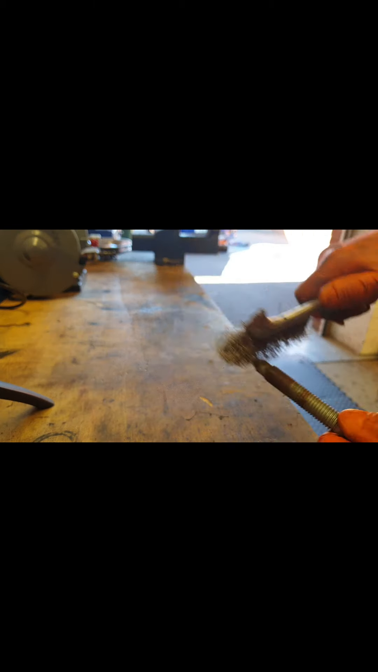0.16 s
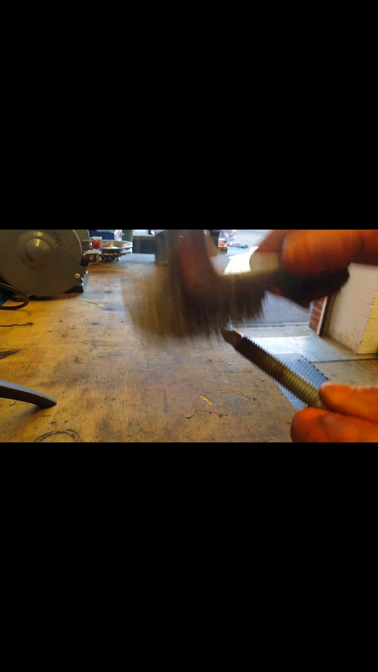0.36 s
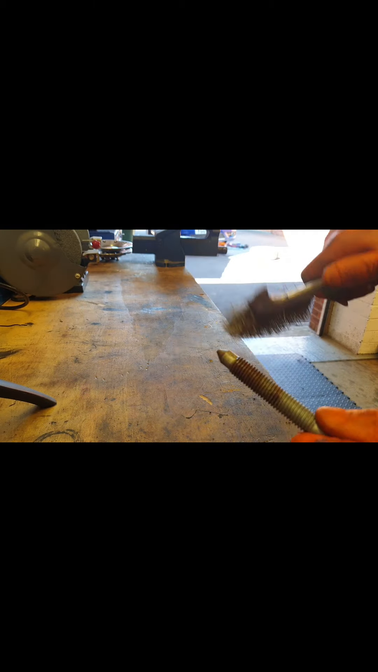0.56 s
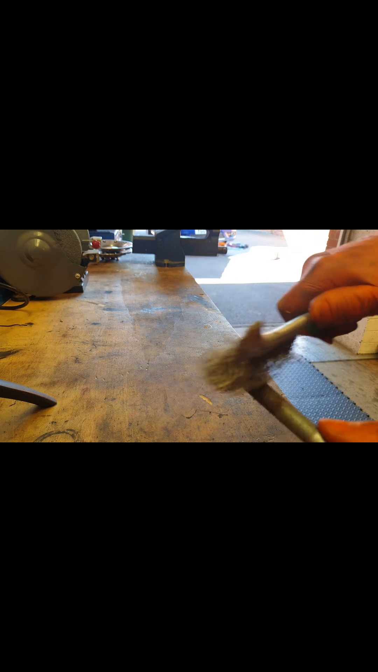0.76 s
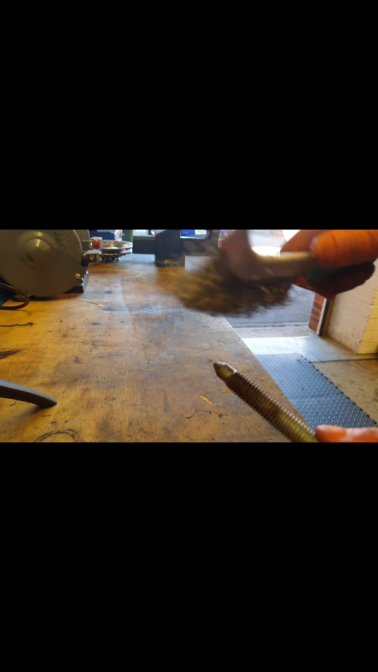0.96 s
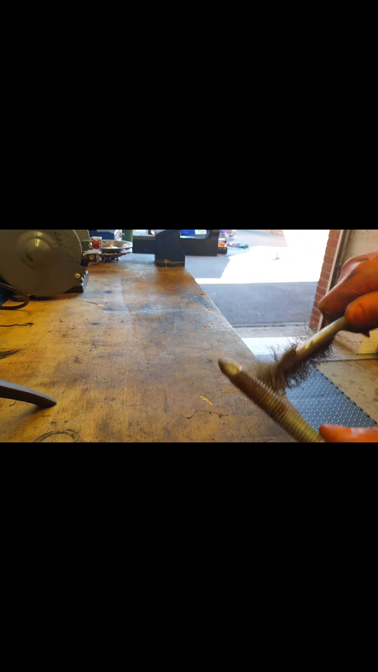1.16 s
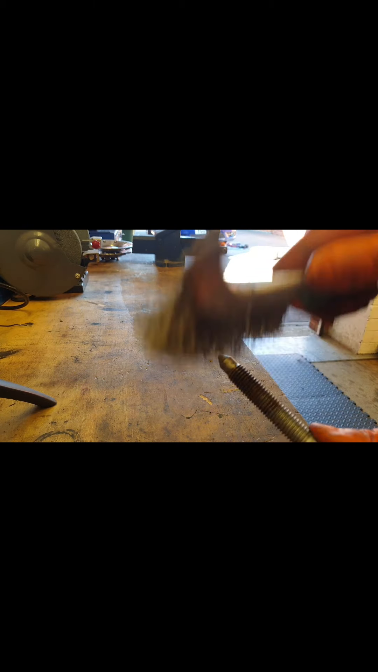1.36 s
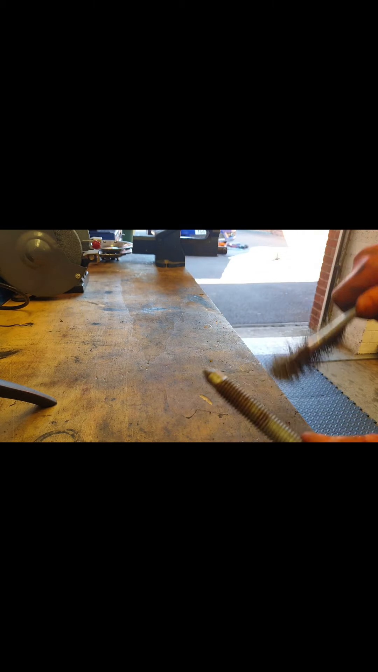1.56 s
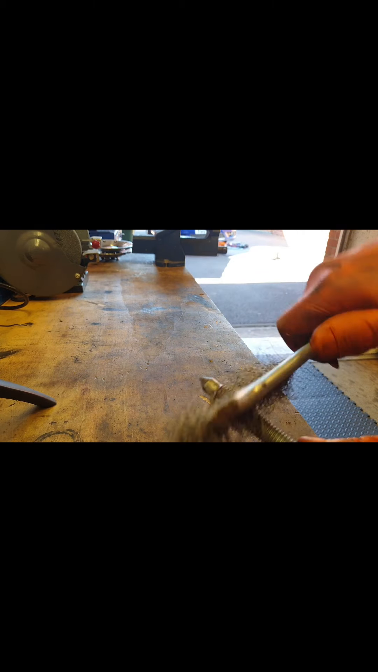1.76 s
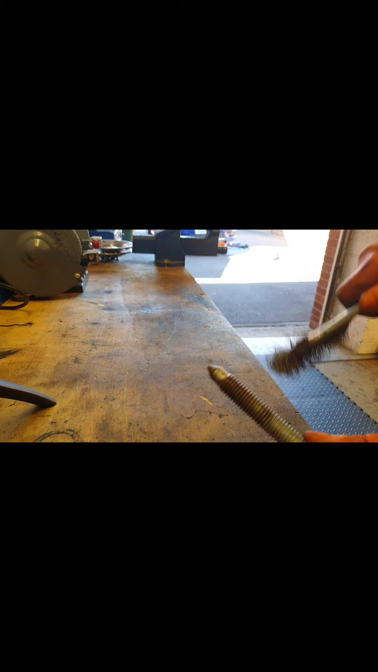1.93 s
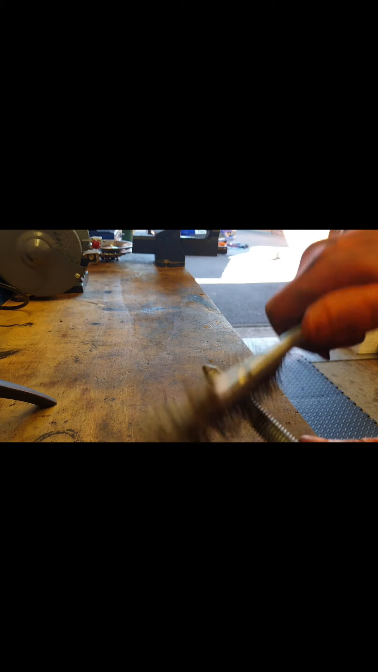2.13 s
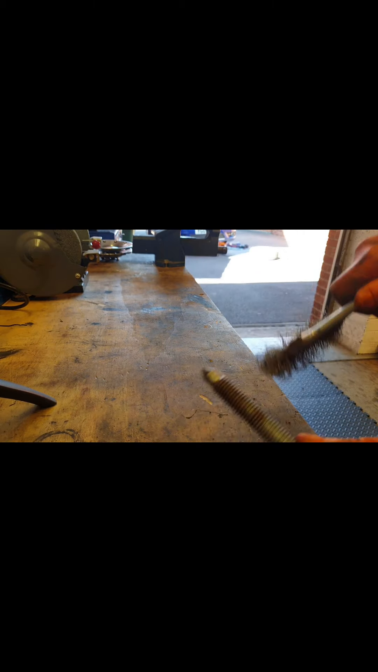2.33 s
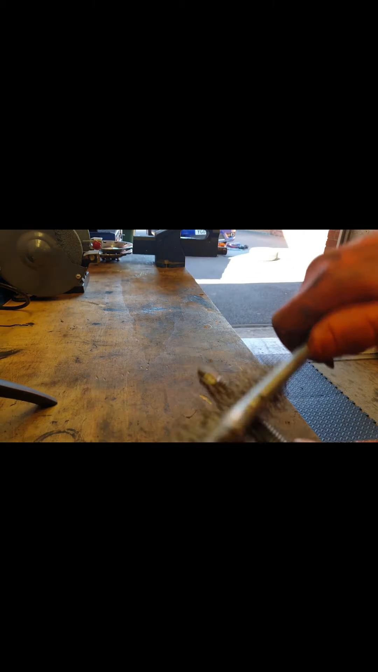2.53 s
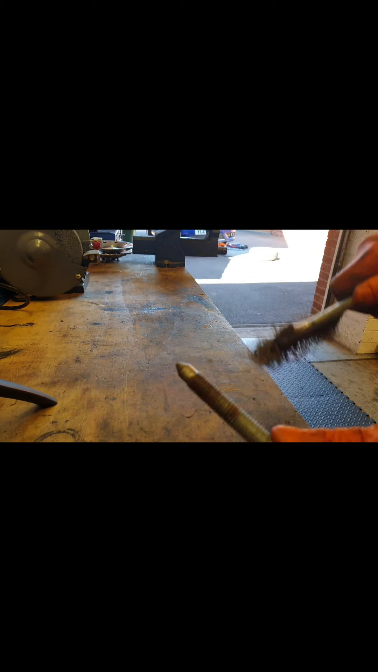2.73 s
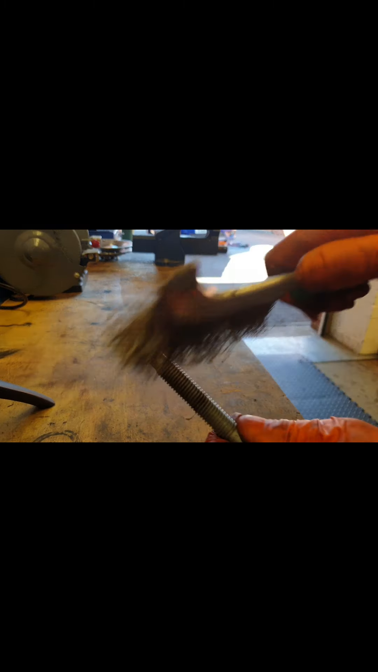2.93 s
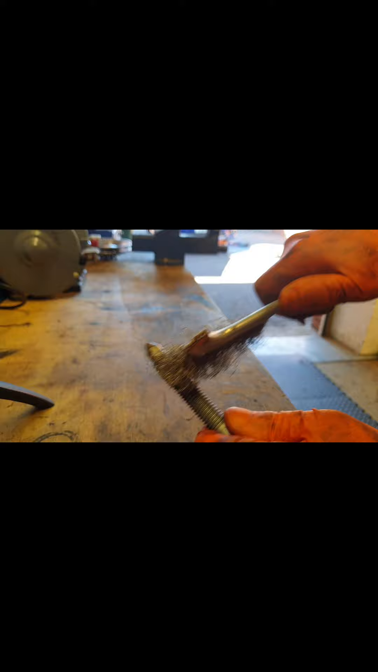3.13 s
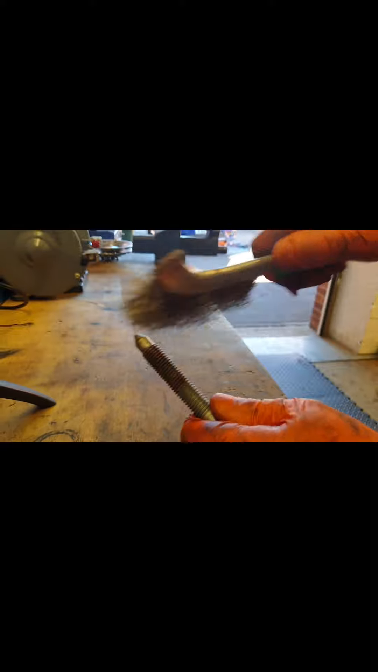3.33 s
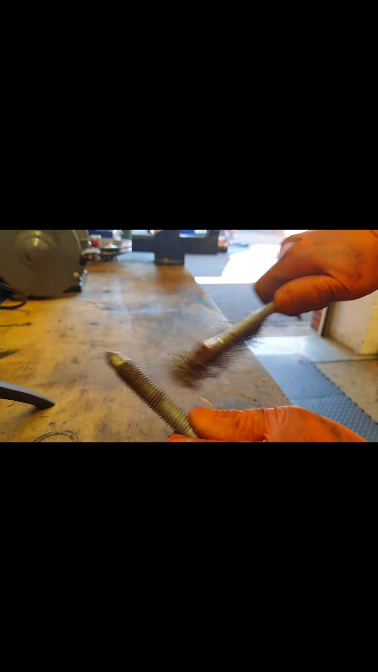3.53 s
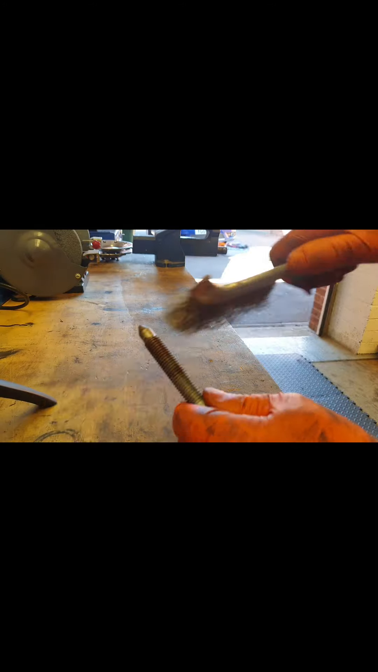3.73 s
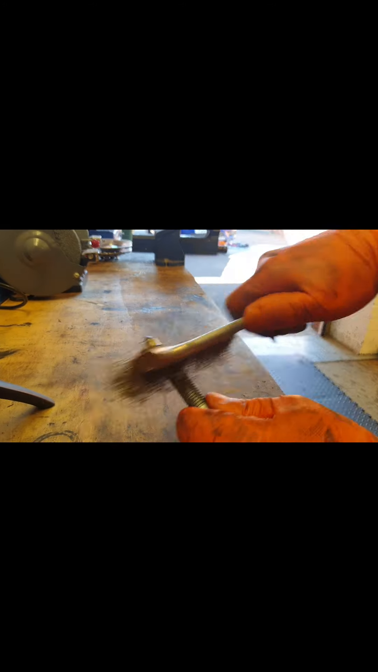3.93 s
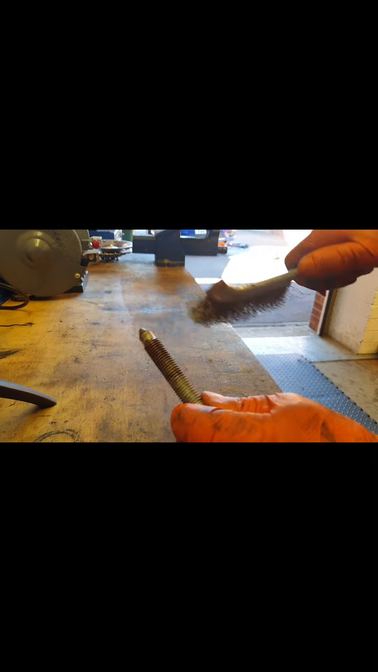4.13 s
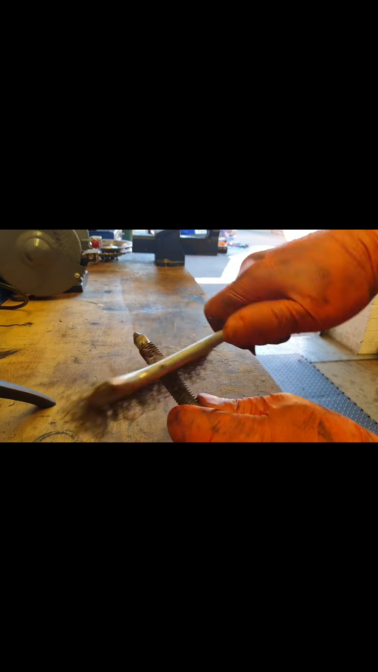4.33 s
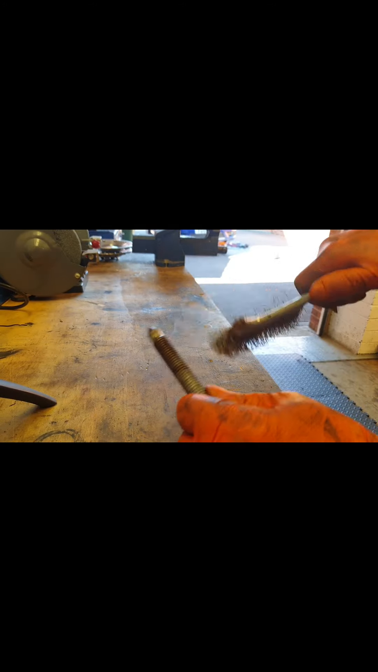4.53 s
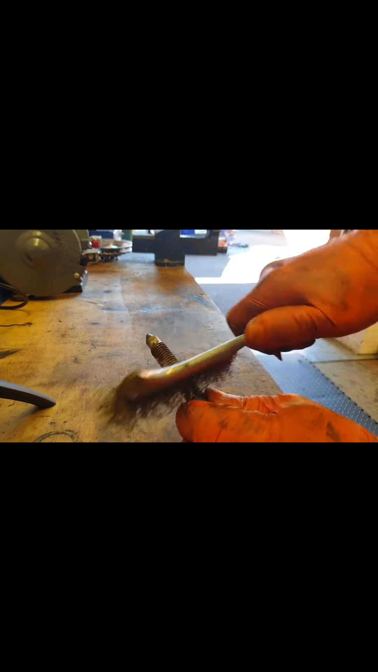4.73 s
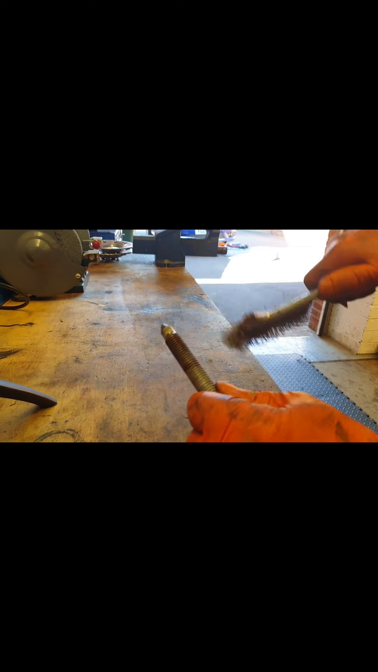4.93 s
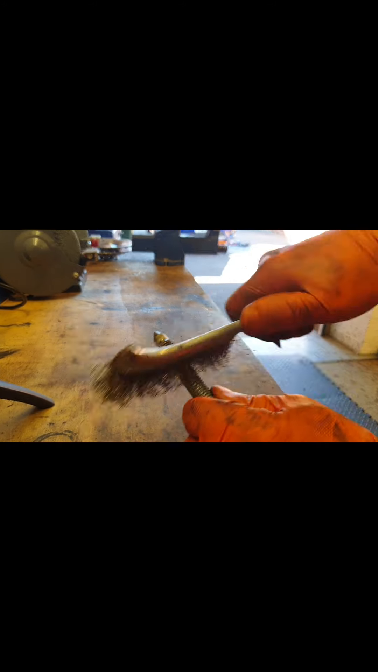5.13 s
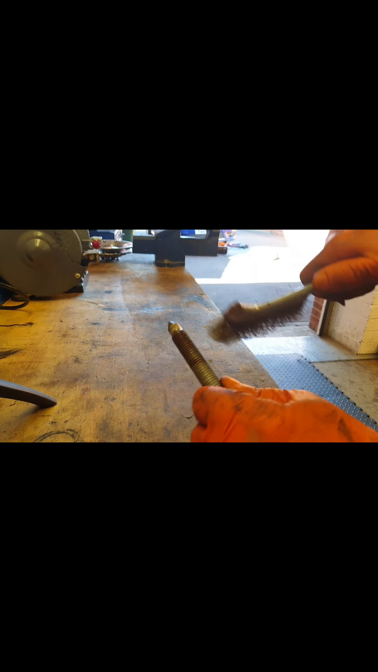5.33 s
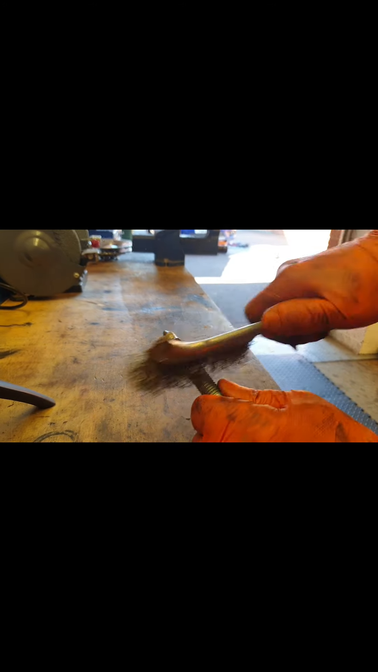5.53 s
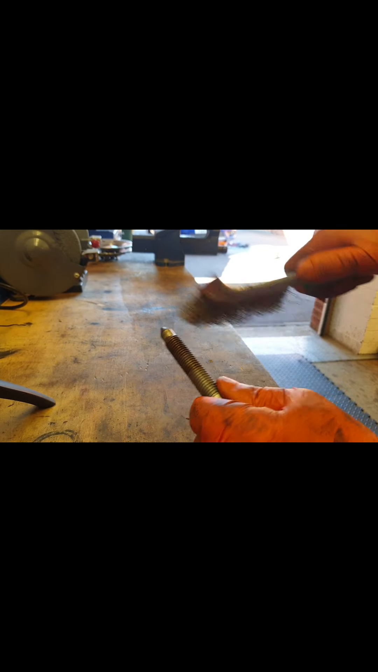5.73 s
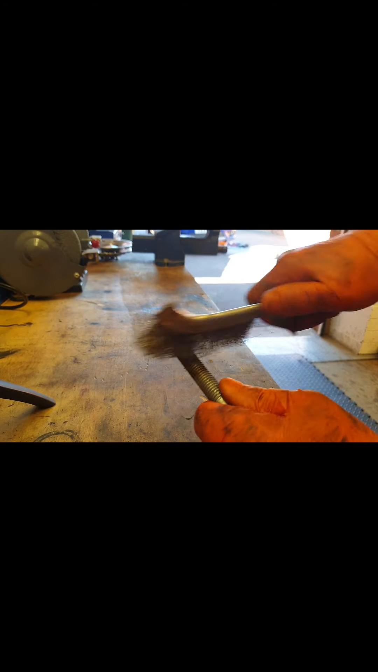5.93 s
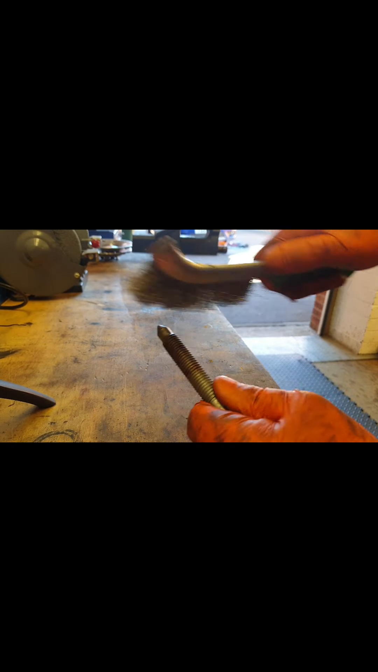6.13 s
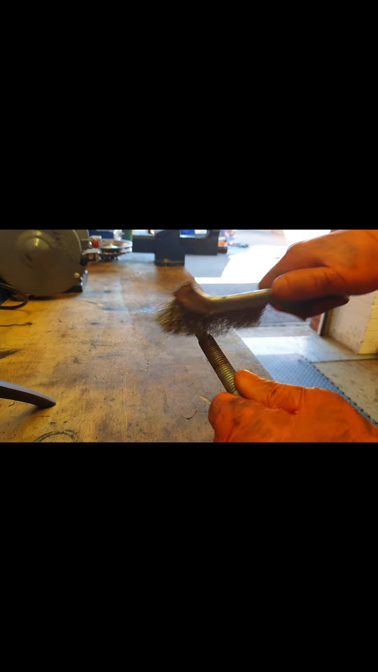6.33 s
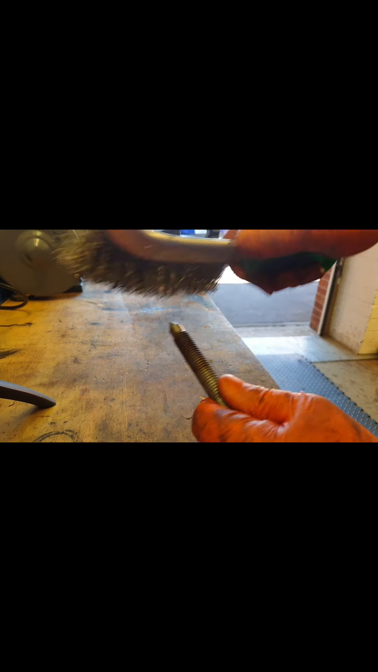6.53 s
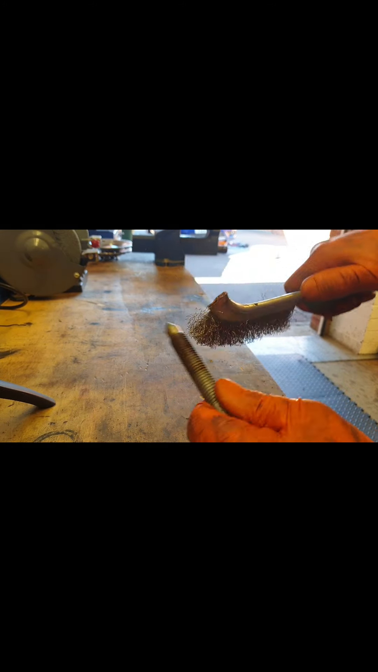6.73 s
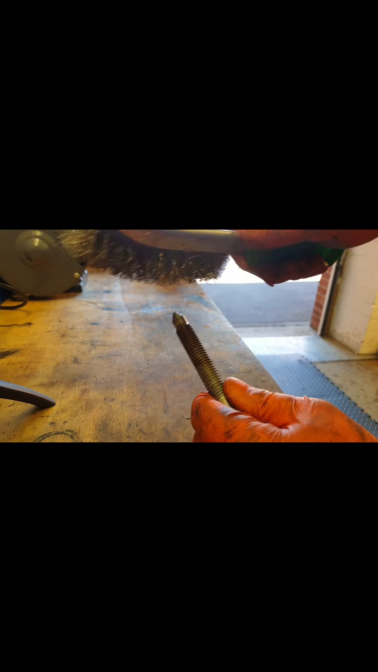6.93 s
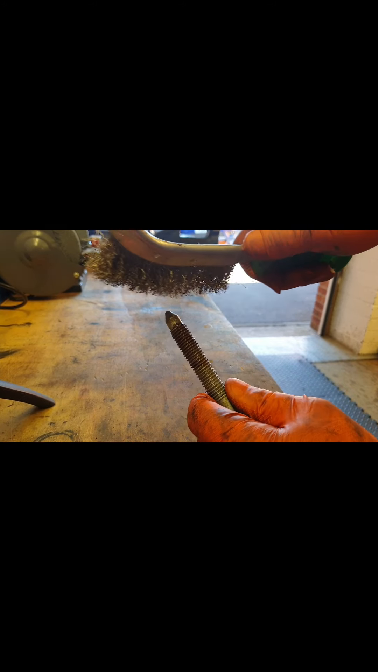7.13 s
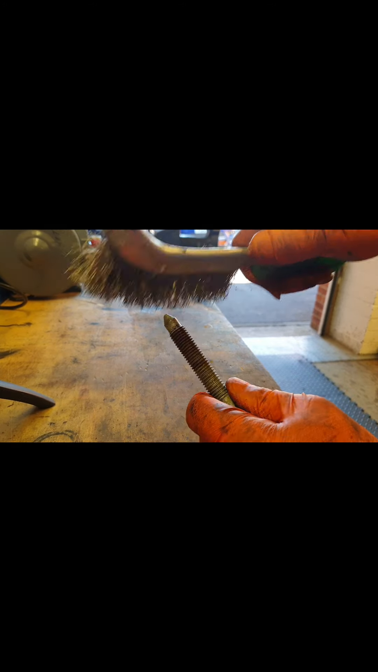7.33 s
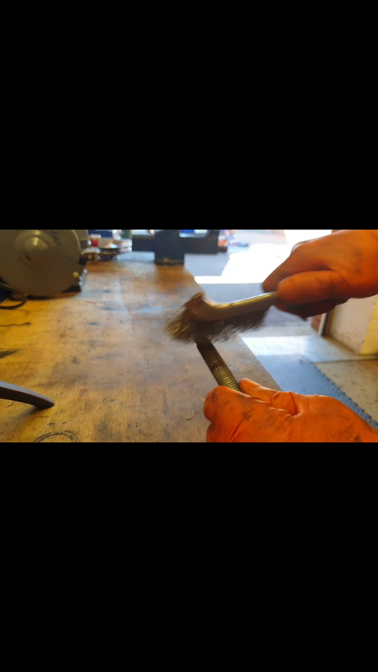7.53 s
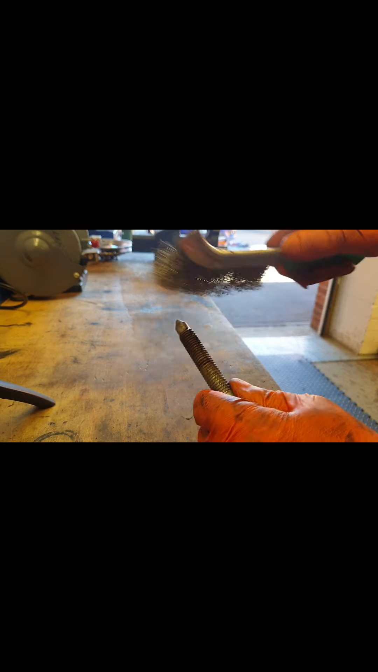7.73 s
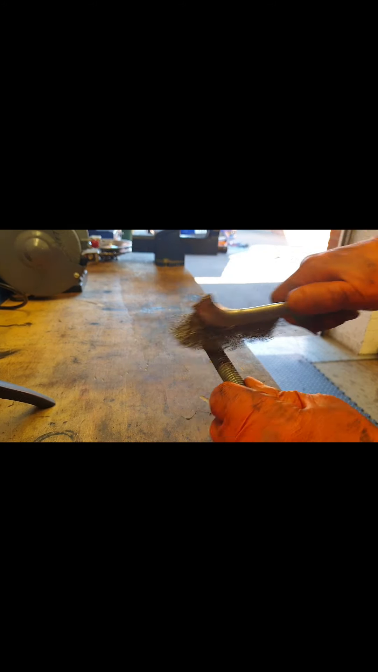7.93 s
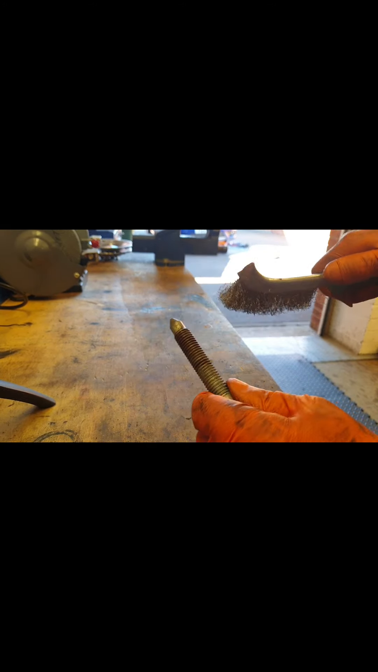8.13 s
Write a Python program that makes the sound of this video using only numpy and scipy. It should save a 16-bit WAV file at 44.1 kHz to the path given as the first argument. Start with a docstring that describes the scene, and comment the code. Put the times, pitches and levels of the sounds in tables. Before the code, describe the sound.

A wire brush rasps in short, bright, slightly ringing strokes across a steel bolt thread, about three a second, with bench thumps growing stronger in a small workshop.

```python
"""On a workbench in a small workshop, a hand wire brush sweeps twenty times across the thread of a steel bolt.
Slipping bristles are bursts of noise that rasp, bend and ring the steel; snagged wires twang as decaying tones.
Each push thumps the bench in its low mode, with noise for the higher ones, and freed wires ring on faintly.
Cloth, skin, loose wires and crumbs of rust add small sounds; a tail of decaying noise answers the brush
over room rumble and a low wavering hum."""
import sys
import numpy as np
from scipy import signal
from scipy.fft import rfft, irfft, next_fast_len
from scipy.io import wavfile
from scipy.ndimage import map_coordinates

SR = 44100
rng = np.random.default_rng(int(sys.argv[2]) if len(sys.argv) > 2 else 0)


def to_wav(sig):
    """Store sig (one row per channel, or 1-D mono) as 16-bit WAV at the path in sys.argv[1].

    Samples outside -1..1 are clipped; the rate is SR.
    """
    pcm = np.clip(np.atleast_2d(sig), -1, 1) * 32767
    pcm = np.round(pcm).astype(np.int16)
    wavfile.write(sys.argv[1], SR, pcm.T)  # frames by channels


N = 360297
T = np.arange(N) / SR

# strokes of the brush, levels before the layer gains; skim_s is the time before the wires bite, bend and
# twang are relative to the scrape, land and shove are thumps of the bench:
# start_s, length_s, skim_s, skim_db, scrape_db, bend_db, twang_db, land_db, shove_db
STROKES = [ (0.104, 0.17, 0.0049, -59, -49, -15, 1.5, -56, -48),
           (0.475, 0.1, 0.02, -52, -45.5, -14.5, -0.5, -63, -61),
           (0.786, 0.14, 0.027, -55.5, -45.5, -14, 1.5, -56, -53.5),
           (1.136, 0.12, 0.0045, -60.5, -45, -16.5, 2.5, -56, -45.5),
           (1.497, 0.11, 0.028, -51.5, -41.5, -17, 1, -40.5, -42.5),
           (1.846, 0.12, 0.053, -53.5, -42, -18.5, 2.5, -42.5, -42.5),
           (2.245, 0.13, 0.051, -49, -45, -17, 1, -48.5, -46),
           (2.627, 0.12, 0.017, -51.5, -45, -18.5, 0, -54, -45.5),
           (3.116, 0.14, 0.082, -52.5, -44.5, -15.5, -4, -60, -43.5),
           (3.522, .115, 0.045, -55.5, -44.5, -11, -2.5, -40, -36),
           (3.958, 0.15, 0.032, -53, -43, -13, -5, -46, -37),
           (4.403, .151, 0.038, -62, -43, -13.5, -3, -44.5, -42),
           (4.805, 0.14, 0.022, -54, -43.5, -10, 0, -37.5, -35),
           (5.197, .148, .045, -56.5, -43.5, -12.5, 0.5, -33, -30.5),
           (5.571, 0.14, 0.048, -56.5, -44, -11, 4, -36, -26),
           (5.944, 0.14, 0.029, -57, -44, -14, -0.5, -29.5, -26.5),
           (6.303, 0.17, 0.028, -60, -43.5, -11.5, 0.5, -30.5, -26.5),
           (6.681, 0.15, 0.067, -50, -47, -11, 4.5, -26.5, -30.5),
           (7.509, 0.16, 0.033, -56.5, -45, -13, -0.5, -33.5, -29),
           (7.947, 0.14, .07, -49.5, -45.5, -10, 0.5, -37, -32), ]
# relative spectrum of rubbed cloth, also used for the crumbs: frequency_hz, level_db
CLOTH_SPECTRUM = [(250, -5), (500, -9.5), (900, -4), (2500, -4), (4000, -3), (7000, 0), (9000, -5.5),
                  (14500, -2.5)]


def amp(db):
    """Level to amplitude: 20 dB is a factor of ten."""
    return 10 ** (np.asarray(db) / 20)


def unit(x):
    """Normalisation of the root mean square to 1."""
    return x / np.sqrt(np.mean(x ** 2) + 1e-20)


def along(points, hz):
    """Interpolation of (frequency, value) points on a logarithmic frequency axis."""
    f, v = np.transpose(points)
    return np.interp(np.log(hz + 1), np.log(f + 1), v)


def wobble(rate):
    """Slow random modulation: a spline through normal deviates, rate knots a second."""
    knots = rng.standard_normal(int(N * rate / SR) + 4)
    return map_coordinates(knots, [T * rate])


def filtered(x, response):
    """Linear filtering: the spectrum of x times a response of frequency."""
    m = next_fast_len(N + SR)
    hz = np.fft.rfftfreq(m, 1 / SR)
    return irfft(rfft(x, m) * response(hz), m)[..., :N]


def coloured(x, spectrum):
    """Spectral shaping by a magnitude response of mean power 1."""
    return filtered(x, lambda hz: unit(amp(along(spectrum, hz))))


def ringing(x, modes):
    """Modal resonance: a sum of damped second-order modes, of mean power 1."""
    def response(f):
        h = sum(amp(db) * 1j * f * width / (centre * centre - f * f + 1j * f * width)
                for centre, width, db in modes)
        return h / np.sqrt(np.mean(abs(h) ** 2))
    return filtered(x, response)


def noise():
    """Interchannel coherence: stereo white noise, most alike in the bass, unrelated at the top."""
    # correlation of left and right: frequency_hz, share
    likeness = [(70, 0.93), (250, 0.8), (600, 0.36), (1200, 0.033), (2200, 0.39), (4500, 0.066), (14000, 0)]

    def mid_side(hz):
        turn = np.arccos(np.clip(along(likeness, hz), -1, 1)) / 2
        return np.array([np.cos(turn), np.sin(turn)])
    mid, side = filtered(rng.standard_normal((2, N)), mid_side)
    return np.array([mid + side, mid - side])


def swells(rows):
    """Gain of light friction: each rub grows and fades exponentially, linearly in decibels."""
    gain = 0
    for s, db, rise, fall in rows:
        drop = np.maximum((s - T) * rise, (T - s) * fall)
        gain = gain + amp(db - np.minimum(drop, 100))
    return gain


def slips(rate, spread_db, life):
    """Stick-slip friction: contacts give way at random moments as short bursts; envelope of rms 1."""
    happens = rng.random(N) < rate / SR
    sizes = amp(spread_db * np.clip(rng.standard_normal(N), -2, 2)) * happens
    power = signal.lfilter([1], [1, -np.exp(-2 / (life * SR))], sizes ** 2)
    return unit(np.sqrt(power))


def background(air_db, hum_db):
    """Ambient noise: steady treble, and unsteady rumble and hum that grow over the first four seconds."""
    # relative spectrum of the room: frequency_hz, level_db
    air_spectrum = [(25, -39), (75, 3), (130, -7.5), (250, -9), (340, -20), (430, -24), (600, -29),
                    (1100, -30), (2300, -31), (3400, -32.5), (6000, -34.5), (7500, -34), (8600, -44),
                    (11000, -36.5), (14500, -31.5)]
    # wavering hum tone, level before the growth: frequency_hz, level_db
    hum_tone = [(253, -74)]
    hum = sum(amp(db + 1.5 * wobble(5)) * np.sin(2 * np.pi * hz * T + .6 * wobble(8)) for hz, db in hum_tone)
    growth = amp(np.interp(T, [0, 4], [-7, 0]))
    air = amp(air_db) * coloured(noise(), air_spectrum)
    rumble = filtered(air, lambda hz: 1 / (1 + (hz / 600) ** 4))
    treble = air - rumble
    return treble + growth * (amp(3.4 * wobble(4.0)) * rumble + amp(hum_db) * hum)


def workshop(x, near_db, far_db, near_t60):
    """Reverberation: the bench top answers within milliseconds, the walls with a longer tail."""
    # reverberation time of the workshop: frequency_hz, t60_s
    shop_decay = [(100, 0.44), (1000, 0.69), (2000, 0.31), (4800, 0.32), (6300, 0.3), (9000, 0.32),
                  (14000, 0.26)]
    hz, t, z = signal.stft(rng.standard_normal((2, SR * 3 // 4)), SR, nperseg=256)
    tail = signal.istft(z * amp(-60 * t / along(shop_decay, hz)[:, None]), SR, nperseg=256)[1]
    age = np.arange(tail.shape[1]) / SR
    near = rng.standard_normal(tail.shape) * amp(-60 * age / near_t60) * (age > .001)
    answer = amp(near_db) * near / np.linalg.norm(near[0]) + amp(far_db) * tail / np.linalg.norm(tail[0])
    return x + signal.fftconvolve(x, answer, axes=1)[:, :N]


def sleeve(level_db):
    """Friction noise of fibres: cloth slides while the hand shifts its grip."""
    # slides of the sleeve, levels before the layer gain: loudest_s, level_db, rise_db_per_s, fall_db_per_s
    slides = [(2.76, -54.5, 900, 153), (2.885, -57, 222.5, 206), (3.08, -53.5, 103, 140.5),
              (3.3, -63.5, 124, 117), (3.476, -54, 214, 258)]
    fibres = slips(rate=4000, spread_db=3, life=.002)
    return amp(level_db) * coloured(swells(slides) * fibres * noise(), CLOTH_SPECTRUM)


def grip(level_db):
    """Friction-driven resonance: skin chafes on the brush handle, which answers with a hollow note."""
    # rubs of the hand, levels before the layer gain: loudest_s, level_db, rise_db_per_s, fall_db_per_s
    chafes = [(1.275, -59, 202, 126), (2.70, -62.5, 702, 100), (3.14, -69.5, 198, 156),
              (7.485, -60.5, 210, 144.5)]
    handle = [(180, 0.5), (300, -8.5), (410, 3.0), (520, -13.0), (800, -37)]  # frequency_hz, level_db
    return amp(level_db) * coloured(swells(chafes) * noise(), handle)


def crumbs(level_db, t60):
    """Exponential decay of noise: rust lands on the bench in faint rustling patters, sharp at first, then dying away."""
    # landings, levels before the layer gain: start_s, level_db
    landings = [(3.76, -53.5), (3.7728, -58), (3.809, -53), (3.833, -56), (4.2936, -55.5)]
    patters = sum(amp(db - 60 * np.clip((T - s) / t60, 0, 2)) * (T >= s) for s, db in landings)
    return amp(level_db) * coloured(patters * noise(), CLOTH_SPECTRUM)


def loose_wires(length, level_db):
    """Lightly damped wires: thin wavering notes swell and fade; the lifted brush shivers wire on wire."""
    # notes of loose wires, levels before the layer gain: loudest_s, level_db, pitch_hz
    singing = [(0.06, -79, 5200), (0.731, -87, 5180), (1.43, -82, 5170), (2.08, -81, 6300),
               (3.34, -71.5, 5120), (4.68, -77, 5100)]
    # shivers of the brush: loudest_s, level_db, rise_db_per_s, fall_db_per_s
    shivers = [(6.9, -72, 130, 127), (7.01, -69, 239.5, 240)]
    notes = 0
    for s, db, hz in singing:
        swell = amp(db - 6.8 * np.minimum(((T - s) / length) ** 2, 20))
        notes = notes + swell * np.sin(2 * np.pi * hz * T + 0.67 * wobble(110))
    # modes: frequency_hz, width_hz, level_db
    shiver = ringing(swells(shivers) * noise(), [(5200, 300, -8), (6520, 1800, -5)])
    return amp(level_db + 6.2 * wobble(60)) * notes + shiver


def contact(start, end, rise, release):
    """Contact gate: a linear onset and an exponential release."""
    return np.clip((T - start) / rise + .5, 0, 1) * np.exp(-np.clip((T - end) / release, 0, 20))


def bench(swell, thump_db, knock_db, shake_db, shake_s):
    """Forced plate vibration: each push swells and fades in the low mode; higher panel modes rumble along."""
    # relative spectrum of the panel modes: frequency_hz, level_db
    knock_spectrum = [(25, -10), (50, 11.5), (90, 6), (125, -3), (170, -6), (210, -13), (260, -12.5),
                      (330, -20), (430, -25), (600, -35), (1200, -34.5)]
    low_hz, scatter = 71.26, 0.079  # low mode of the bench top, its log spread from push to push
    shove_lead_s, midway_db = 0.0422, -7.5  # shove ahead of the lift; weaker push halfway
    rebound_db, rebound_follows, rebound_lag_s = -31, 0.64, 0.0202  # level, dB per dB of shove, delay after lift
    shake_follows = 0.31  # dB of lingering shake per dB of shove
    low, push, rub = np.zeros((3, N))
    all_detunes = rng.standard_normal((len(STROKES), 4))
    for (s, length, *_, land_db, shove_db), detunes in zip(STROKES, all_detunes):
        shove = s + length - shove_lead_s
        pushes = [(s, land_db),
                  ((s + shove) / 2, (land_db + shove_db) / 2 + midway_db),
                  (shove, shove_db),
                  (s + length + rebound_lag_s, rebound_db + rebound_follows * shove_db)]
        for (at, db), detune in zip(pushes, detunes):
            span = slice(round(at * SR), round(at * SR) + SR // 2)
            t = np.abs(T[span] - at)
            shape = amp(db) * (t / swell * np.exp(1 - t / swell)) ** 1.75
            low[span] += shape * np.sin(2 * np.pi * low_hz * np.exp(scatter * detune) * t)
            push[span] += shape
        # the bench keeps shaking after every stroke
        rub += amp(shake_follows * shove_db) * contact(s, s + length, rise=0.028, release=shake_s)
    panel = coloured((amp(knock_db) * push + amp(shake_db) * rub) * noise(), knock_spectrum)
    return amp(thump_db) * low + panel


def pressure(release):
    """Friction follows load: gains of scrape, bend and twang as wires skim, bite, press harder and lift."""
    # the brush skips off the thread in mid-stroke: centre_s, half_length_s, depth_db
    skips = [(0.172, 0.007, 16), (0.203, 0.016, 12), (0.854, 0.0055, 15), (3.545, .01, 11.5),
             (5.217, 0.0075, 6), (6.397, .016, 18.5), (6.757, 0.01, 13), (8.008, .012, 8.5),
             (8.082, .012, 8)]
    bite_s, lift_s, lift_db = 0.024, 0.012, 6.5  # time to dig in, time to ease off, level lost by then
    swell_db, bend_grows_db = 3.5, 2  # growth of the scrape over a stroke, further growth of the bending
    light_bend_db = 3.5  # under light pressure bending outweighs the rasp a little more
    # share of the stroke where wires twang most, fall to either side, level there
    twang_peak, twang_fade_db, twang_peak_db = .38, 28, 2.5
    uneven_db, uneven_rate = 1.66, 70  # the hand's pressure wavers: depth, knots per s
    gains = np.zeros((3, N))
    for s, length, skim, skim_db, db, bend_db, twang_db, _, _ in STROKES:
        span = slice(round(s * SR), round((s + length + .1) * SR))
        t = T[span] - s
        way = np.minimum(t / length, 1)
        bite = np.clip((t - skim) / bite_s + .5, 0, 1)
        ease = np.clip((t - length) / lift_s + 1, 0, 1)
        level = skim_db + bite * (db + swell_db * (way - .5) - skim_db) - lift_db * ease
        scrape = amp(level) * np.exp(-np.maximum(t - length, 0) / release)
        bend = amp(bend_db + bend_grows_db * (way - .5) + light_bend_db * (1 - bite + ease))
        twang = amp(twang_db + twang_peak_db - twang_fade_db * (way - twang_peak) ** 2)
        gains[:, span] += [scrape, scrape * bend, scrape * twang]
    skips_db = sum(db * np.exp(-np.minimum(((T - s) / half) ** 2, 20)) for s, half, db in skips)
    return gains * amp(uneven_db * wobble(uneven_rate) - skips_db)


def catches(scrape):
    """Stick-slip at large scale: (s, gain) rows of big snags, and lesser random ones under the stroke."""
    # a whole tuft catches on the thread and lets go, levels before later gains: start_s, level_db
    big_snags = [(0.145, -38), (0.184, -44), (0.502, -35), (0.831, -40), (1.499, -39.5), (1.507, -34.5),
                 (1.534, -46), (1.912, -41), (2.285, -32.5), (2.324, -33.5), (2.642, -41), (3.524, -40.5),
                 (4.827, -36), (4.857, -44), (4.896, -34), (5.232, -40.5), (5.296, -35), (5.626, -37),
                 (5.65, -42), (6.033, -34), (6.399, -35), (6.720, -33), (6.772, -32), (7.51, -51),
                 (7.538, -42.5), (7.587, -32), (7.965, -44.5), (8.029, -35.5)]
    rate, lesser_db = 16, -1  # lesser catches per s, level over the scrape
    at = np.flatnonzero(rng.random(N) < rate / SR)
    lesser = [(i / SR, scrape[i] * amp(lesser_db)) for i in at if scrape[i] > 0]
    return [(s, amp(db)) for s, db in big_snags] + lesser


def snags(rows, life, gain_db):
    """Impulsive release: tufts spring off the thread, each an exponentially decaying envelope."""
    kicks = np.zeros(N)
    for s, gain in rows:
        kicks[round(s * SR)] = gain * amp(gain_db)
    return signal.lfilter([1], [1, -np.exp(-1 / (life * SR))], kicks)


def flicks(force, rate, spread_db):
    """Random release of stored bending: (s, gain) rows of single wires that spring free under the stroke."""
    at = np.flatnonzero(rng.random(N) < rate / SR)
    sizes = amp(spread_db * np.clip(rng.standard_normal(N), -2, 1.5))
    return [(i / SR, force[i] * sizes[i]) for i in at if force[i] > amp(-65)]


def twangs(rows, wire_hz, scatter, t60):
    """Damped free vibration: each flicked wire sounds its own pitch, with a phase lag between channels."""
    out, t = np.zeros((2, N + SR)), np.arange(SR // 25) / SR
    decay = amp(-60 * t / t60) * (1 - np.exp(-t / 0.00096))
    for (s, gain), (detune, lag, phase) in zip(rows, rng.standard_normal((len(rows), 3))):
        angle = 2 * np.pi * (wire_hz * np.exp(scatter * detune) * t + phase)
        out[:, round(s * SR):][:, :len(t)] += gain * decay * np.sin([angle + lag, angle - lag])
    return out[:, :N]


def patchy(x, depth_db):
    """Time-varying spectrum: colour shifts as tufts of different lengths meet the thread, less in the top fizz."""
    hz, t, z = signal.stft(x, SR, nperseg=512)
    field = rng.standard_normal((len(hz) // 2 + 2, len(t) // 4 + 2))
    places = np.mgrid[:len(hz), :len(t)] / np.reshape([2, 4], (2, 1, 1))
    gain = map_coordinates(field, places)
    depth = depth_db * along([(5500, 1), (9000, .3)], hz)[:, None]
    # the second term offsets the power that random gains would add
    shifted = z * amp(depth * gain - depth ** 2 * np.log(10) / 20)
    return signal.istft(shifted, nperseg=512)[1][:, :N]


def brush(rasp_db, bend_db, steel_db, tuft_db, twang_db, free_db):
    """Stick-slip excitation of resonators: slipping wires rasp, bend and ring the steel; tufts snap and twang."""
    # relative spectra of rasp, bending wires and fluttering tufts: frequency_hz, level_db
    rasp_spectrum = [(1300, -72), (2500, -31.5), (3250, -17), (3700, -9.5), (4250, -9), (4800, -12),
                     (5300, -3), (5900, 2), (7400, -2), (8400, -10), (10000, -8.5), (11700, -6),
                     (14500, -7)]
    bending_spectrum = [(400, -34), (750, -51), (1030, -9.5), (1170, -26), (1320, -9), (1500, -14),
                        (1720, 5), (1950, 7), (2250, 2.5), (2600, -8), (3500, -24.5)]
    tuft_spectrum = [(3000, -80), (4200, -7), (4750, 5), (5250, 5.5), (5700, -4.5), (6500, -34),
                     (9000, -53)]
    # modes of bolt and brush, and of the free wires, relative levels: frequency_hz, width_hz, level_db
    steel_modes = [(1042, 18, -29), (2010, 68, -11.5), (2750, 16, -10), (2958, 21, -13), (3524, 31, -2),
                   (4970, 38, -8), (6750, 89, 3), (7240, 70, -12.5), (9540, 48, -6), (13100, 50, -9)]
    wire_modes = [(5200, 2.7, -8), (5540, 3, -2), (6200, 6.1, -4), (6030, 1.8, 2), (6600, 3.9, 13)]
    scrape, bend, spring = pressure(release=.01)
    caught = catches(scrape)
    # rows of tufts cross the bolt in uneven bunches
    grain = unit(slips(rate=2800, spread_db=3.5, life=.0006) * amp(1.5 * wobble(190)))
    snap = snags(caught, life=.003, gain_db=2)
    force = (scrape * grain + .5 * snap) * noise()
    rasp = amp(rasp_db) * patchy(coloured(force, rasp_spectrum), depth_db=6.0)
    bending = amp(bend_db) * patchy(coloured(bend * grain * noise(), bending_spectrum), depth_db=6.0)
    steel = amp(steel_db) * ringing(scrape * grain * noise(), steel_modes)
    # many wires at once blur into a band around their own note; single ones stand out of it
    flutter = coloured((amp(tuft_db) * spring * grain + .5 * snap) * noise(), tuft_spectrum)
    tufts = patchy(flutter, depth_db=3)
    flicked = flicks(spring, rate=350, spread_db=6.5)
    twang = amp(twang_db) * twangs(flicked, wire_hz=5192, scatter=0.062, t60=0.019)
    louder = [(s, gain * amp(5)) for s, gain in caught]
    snagged = twangs(louder, wire_hz=5120, scatter=.04, t60=.022)
    # the wire ends keep ringing in the air, beating against each other
    free = amp(free_db + 3.6 * wobble(24)) * ringing(force, wire_modes)
    return rasp + bending + steel + tufts + twang + snagged + free


def scene():
    """Superposition: brush and bench, the small sounds, and the room's own."""
    room = background(air_db=-64.5, hum_db=0)
    small = sleeve(level_db=2.0) + grip(level_db=3.5) + crumbs(level_db=-13.5, t60=0.21)
    small = small + loose_wires(length=0.04, level_db=3.5)
    thuds = bench(swell=0.025, thump_db=-3, knock_db=-15, shake_db=-49.5, shake_s=0.16)
    scrub = brush(rasp_db=4.5, bend_db=3.5, steel_db=-7.5, tuft_db=-3.5, twang_db=2.5, free_db=-44)
    scrub = workshop(scrub, near_db=-6.5, far_db=-14, near_t60=0.063)
    return scrub + thuds + small + room


def record(dry):
    """Band limitation: a very steep low-pass filter."""
    top_hz = 14600
    return filtered(dry, lambda hz: 1 / (1 + (hz / top_hz) ** 160))


dry = scene()
out = record(dry)
to_wav(out)
```